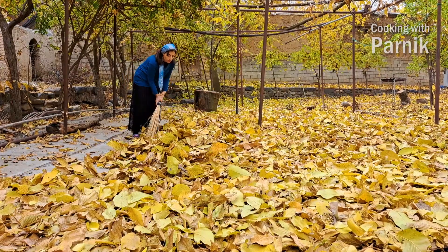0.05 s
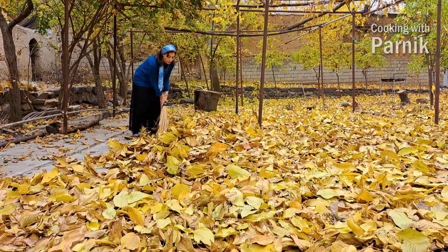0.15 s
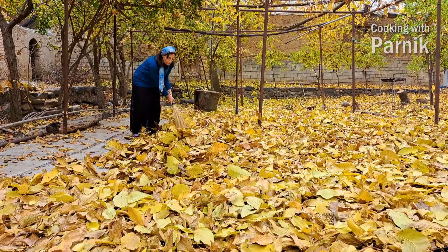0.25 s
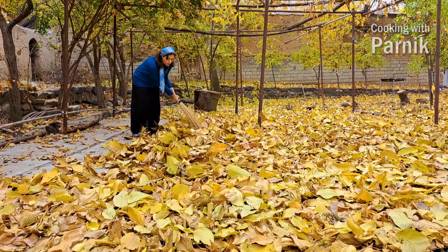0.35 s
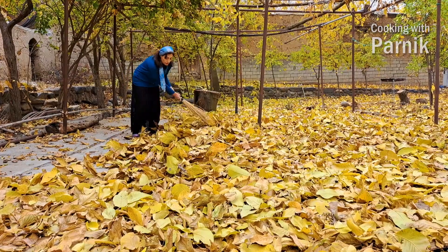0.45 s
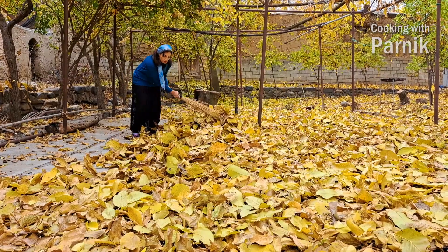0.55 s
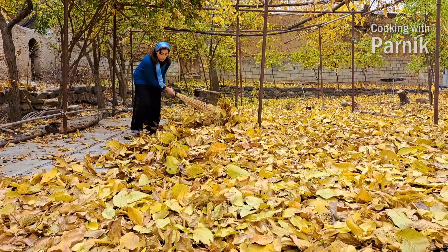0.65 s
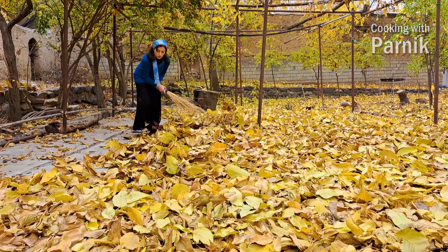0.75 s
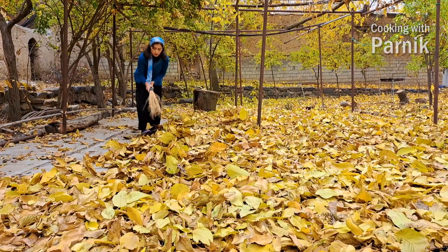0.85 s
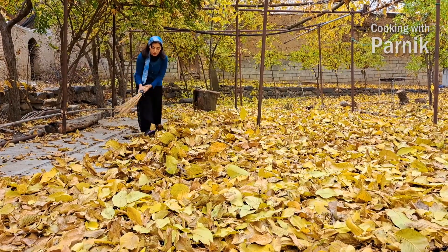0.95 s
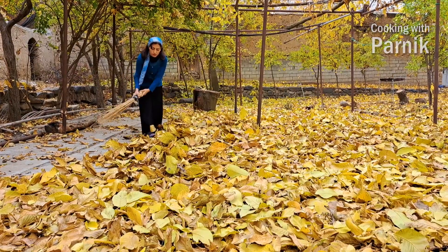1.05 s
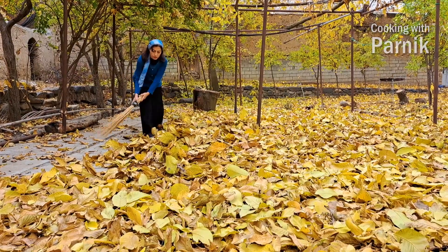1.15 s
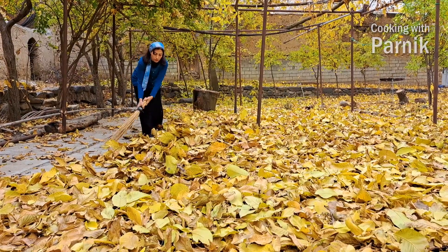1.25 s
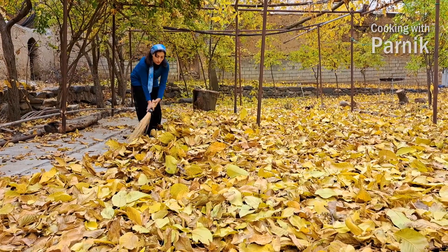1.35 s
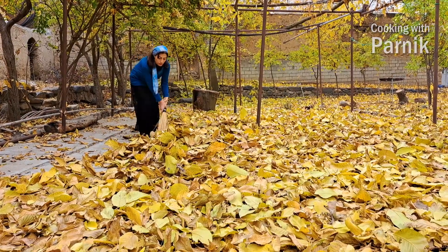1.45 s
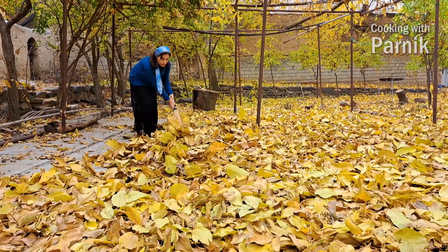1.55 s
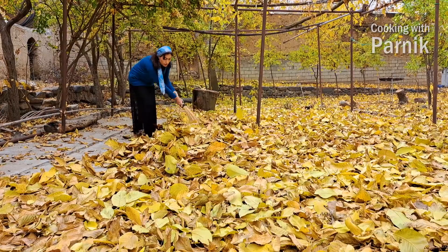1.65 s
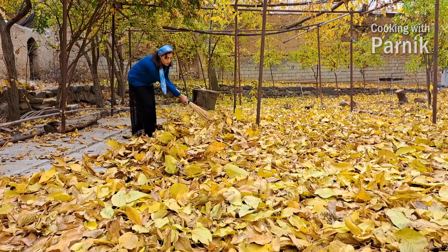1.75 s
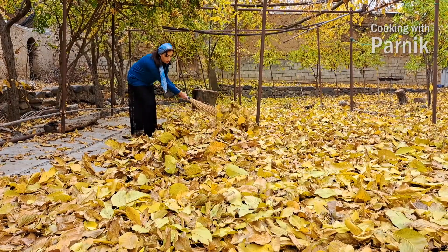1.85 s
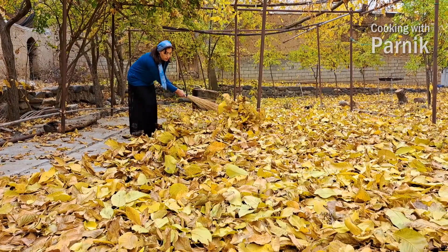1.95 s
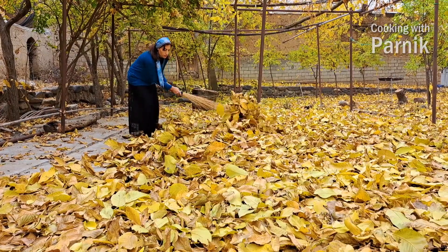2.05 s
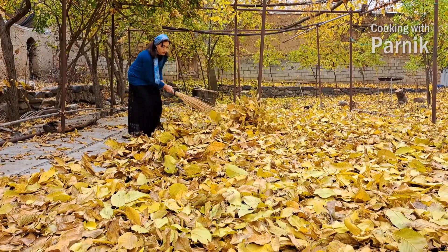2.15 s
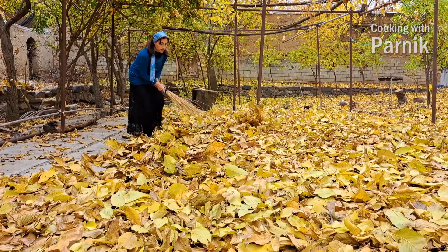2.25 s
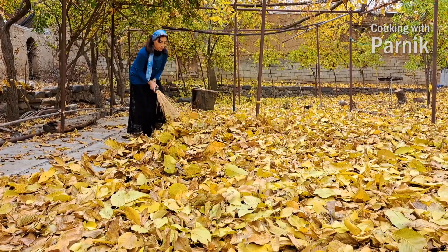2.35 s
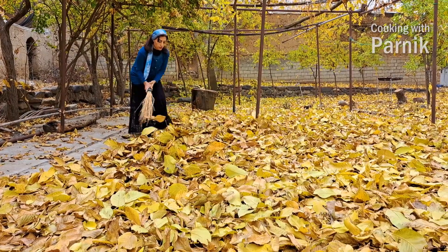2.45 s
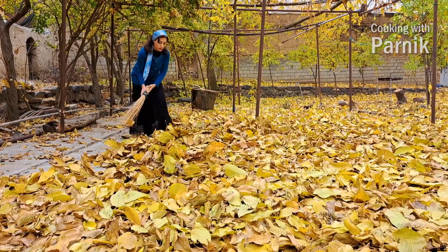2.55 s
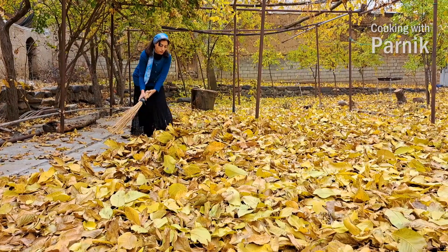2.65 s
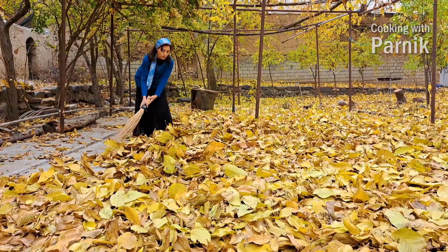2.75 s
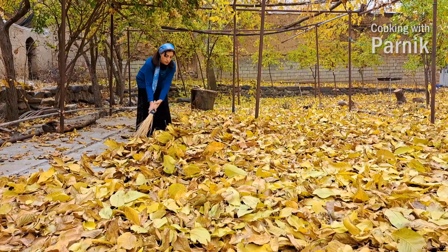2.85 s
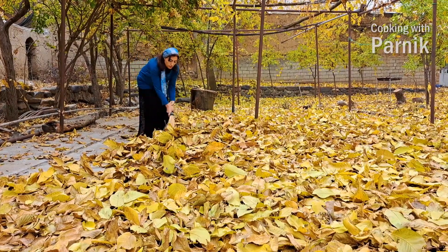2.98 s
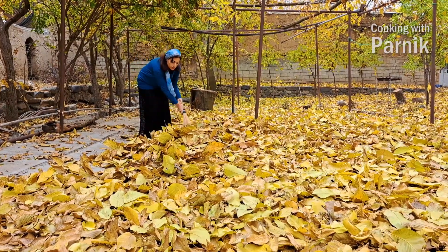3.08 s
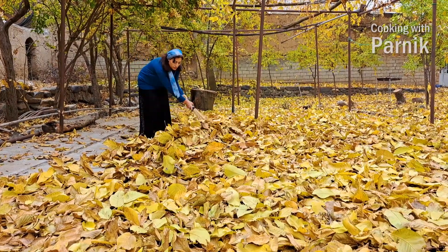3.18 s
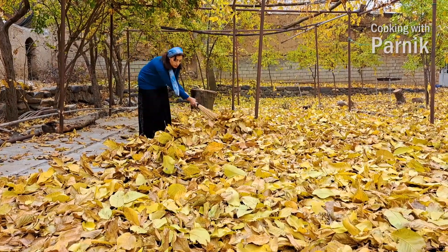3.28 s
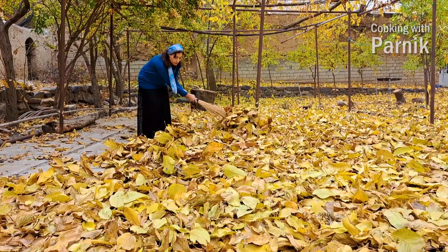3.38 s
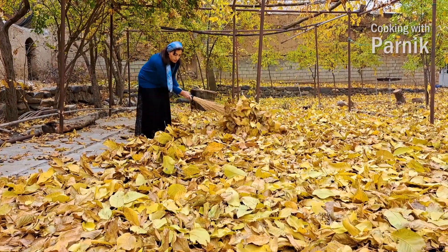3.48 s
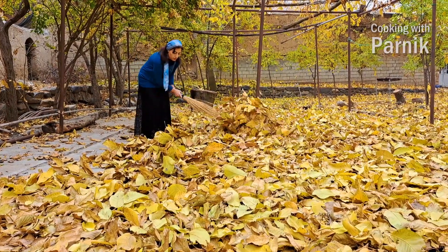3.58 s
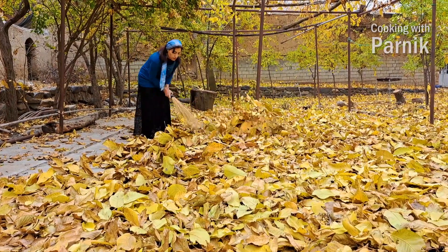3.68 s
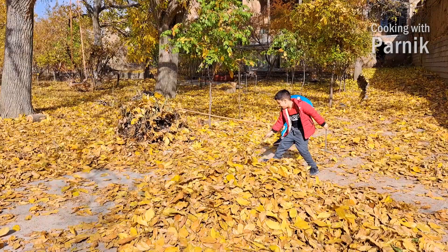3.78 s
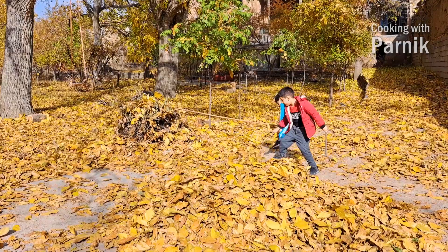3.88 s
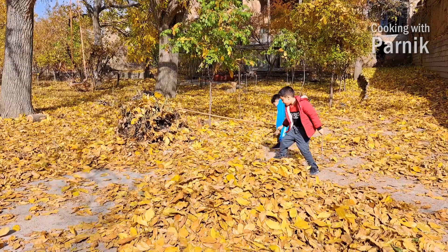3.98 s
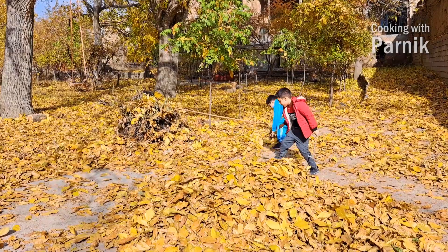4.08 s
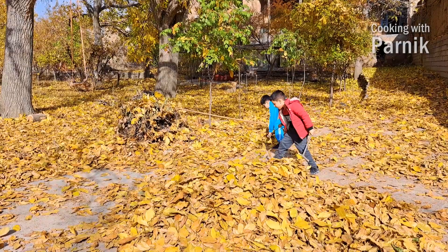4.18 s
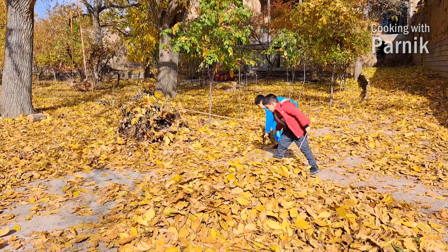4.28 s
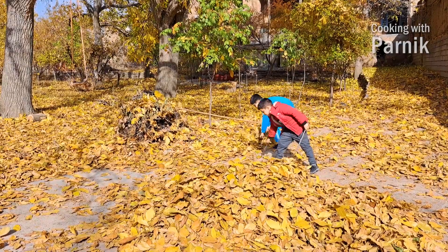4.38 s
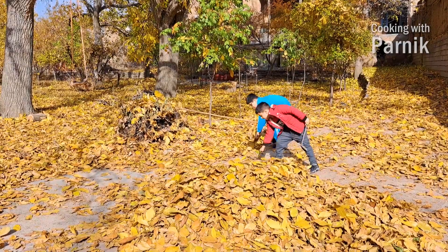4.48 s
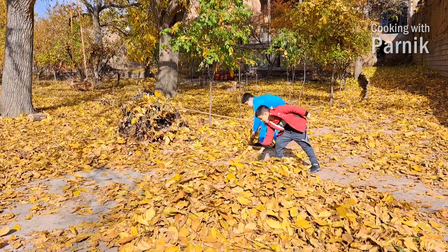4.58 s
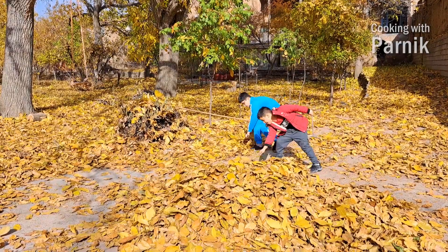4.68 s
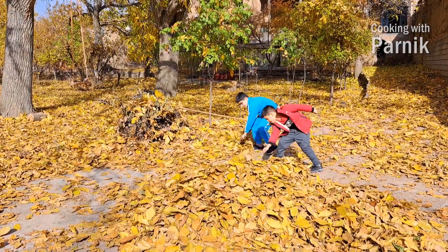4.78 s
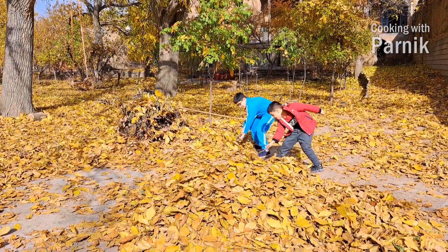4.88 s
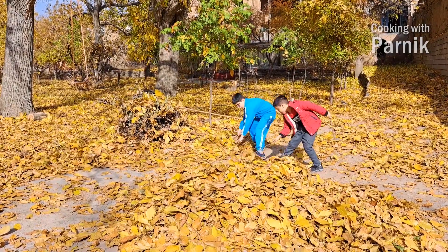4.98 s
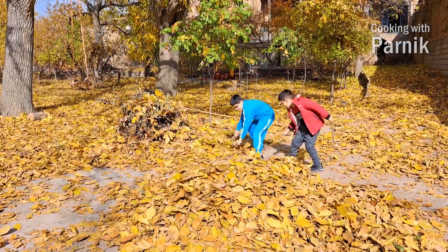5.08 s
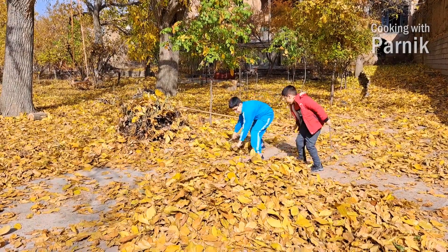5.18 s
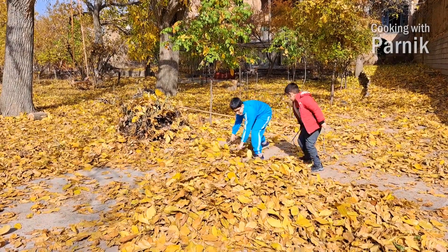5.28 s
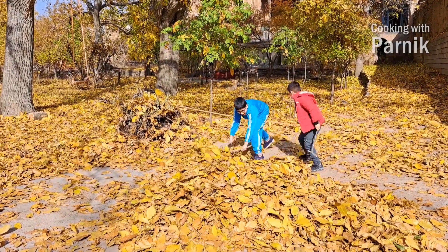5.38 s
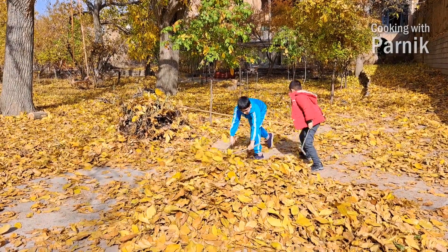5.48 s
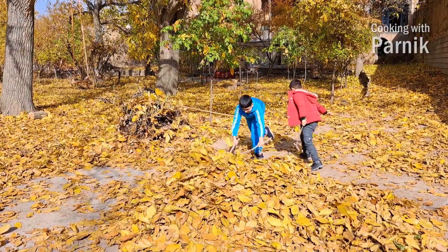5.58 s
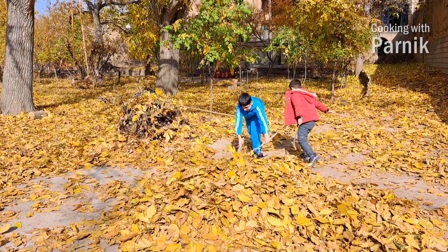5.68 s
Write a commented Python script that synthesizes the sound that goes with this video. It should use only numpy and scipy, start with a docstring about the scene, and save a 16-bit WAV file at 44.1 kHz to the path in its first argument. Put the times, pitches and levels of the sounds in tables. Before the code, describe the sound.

Outdoors in a quiet yard, a straw broom makes three strokes through deep dry leaves, each a quick bright scratch swelling into a fuller rustle, with softer returns and a few sharp snaps. Near four seconds the sound cuts to another spot, where feet and hands push a leaf heap in a longer, steadier rustle with dull knocks. Distant traffic rumbles faintly low down. Stereo microphone at moderate distance, almost no echo.

```python
"""A straw broom sweeps dry leaves over paving in three strokes; then, at another spot, feet and hands shove a heap along.
Leaves: dense random snaps over blurred noise, split into scratch, fizz, rustle and drag, driven by effort and load.
Single snaps are short noise puffs; dull knocks are pulses of a few cycles at most, with a short scatter.
Far traffic is shaped noise, with low thuds and swells in the same band, over a steady wash.
Two ports, each with its own colour, hear it all."""
import sys
import numpy as np
from scipy import signal
from scipy.fft import rfft, irfft, next_fast_len
from scipy.io import wavfile
from scipy.ndimage import uniform_filter1d

SR = 44100
rng = np.random.default_rng(int(sys.argv[2]) if len(sys.argv) > 2 else 0)


def digitize_waveform(pressure):
    """Quantize a signal to 16-bit integers and store it at the path in sys.argv[1].

    Rows of a 2-D input are taken as channels; values are limited to [-1, 1].
    """
    field = np.atleast_2d(pressure).T
    bounded = np.clip(field, -1, 1)
    quanta = np.round(bounded * 32767).astype(np.int16)
    wavfile.write(sys.argv[1], SR, quanta)


def ratio_of_db(decibels):
    """Turn decibels (scalar or array-like) into linear amplitude factors; 0 dB maps to 1."""
    return 10 ** (np.asarray(decibels, float) / 20)


N = 252693
TIME_S = np.arange(N) / SR
FREQ_HZ = np.fft.rfftfreq(next_fast_len(N + 4096, True), 1 / SR)
SPOT_CHANGE_S = 3.836  # from here the microphone is at the other spot

# Parts in order: 0 early strokes, 1 third stroke, 2 heap far, 3 heap near [t/s, part/1]
PARTS = [(2.870, 0), (2.878, 1), (3.8358, 1), (3.8362, 2), (4.5, 2), (5.1, 3)]
# Sweeping, one table a stroke with its return, the last for the heap [t/s, effort/dB, load of leaves/dB]
STROKES = [
    [(0, -41.5, -6), (.07, -44.5, -15), (.11, -38.5, -19), (.175, -37.5, -24), (.215, -32, -26),
     (.275, -24, -9), (.5, -32, -2), (.69, -34, -10.5), (.73, -42.5, -11), (.94, -42, -12),
     (1.06, -46, -12), (1.14, -50, -10.5), (1.303, -48.5, -23)],
    [(1.309, -40, -28), (1.335, -36, -26), (1.365, -35, -25), (1.45, -24.5, -22), (1.495, -22.5, -20.5),
     (1.52, -22.5, -11.5), (1.66, -28, -3.5), (1.81, -26, -5), (1.87, -30, -2), (2.01, -31, -11),
     (2.045, -35.5, -11), (2.165, -34, -12.5), (2.21, -38.5, -8), (2.37, -38, -12), (2.5, -39, -9),
     (2.68, -51.5, -11.5), (2.875, -53.5, -14.5)],
    [(2.878, -43.5, -36), (2.913, -36, -25), (2.97, -28, -18.5), (2.995, -28, -8), (3.13, -29.5, -2),
     (3.19, -26, -1), (3.67, -31, -11), (3.76, -35.5, -12.5), (3.815, -33, -8), (3.835, -33, -6)],
    [(3.837, -52.5, 0.5), (3.92, -40.5, -14), (4.04, -37, -6), (4.3, -35, -6), (4.59, -30.5, -6),
     (4.685, -25, -7), (4.725, -30, -4), (4.89, -30, -4), (5.12, -28, -4), (5.25, -27.5, -5.5),
     (5.35, -25, -5), (5.56, -26.5, -4.5), (5.72, -30.5, -2.5)],
]
# Relative spectral densities of the upper voices [f/Hz, level/dB]
SCRATCH_COLOUR = [(5000, -55), (7500, -5), (9000, -3.5), (11000, 0), (13000, 1.5), (16000, -2.5)]
FIZZ_COLOUR = [(1500, -22), (3000, -3.5), (5000, 3.5), (7500, 0), (9000, -12.5), (12000, -33)]
# Rustle: strokes 1-2, stroke 3, heap; one table each, relative density [f/Hz, level/dB]
RUSTLE_COLOURS = [
    [(600, -18.5), (1050, -9.5), (1600, 1), (2200, -1.5), (2900, -3), (4500, -13.5), (7000, -47)],
    [(600, -16.5), (1050, -5.5), (1550, 1.5), (2200, -2), (2900, -3), (4500, -10), (7000, -29)],
    [(600, -28), (1100, -9), (1450, 1), (1900, -2), (2300, -1.5), (2800, -3.5), (4500, -8.5), (7000, -20.5)],
]
# Drag: strokes, heap far, heap near; one table each, relative density [f/Hz, level/dB]
DRAG_COLOURS = [
    [(70, -13), (160, -8.5), (260, -2.5), (400, -1), (530, 0.5), (750, -5), (1050, -10), (1600, -17.5)],
    [(60, -30), (160, -1.5), (300, -2), (430, -8.5), (650, -3), (1050, -1.5), (1600, -32)],
    [(70, -20), (240, -3), (430, -9), (600, -9), (800, 0.5), (1100, -5.5), (1600, -46)],
]
# Voice level over effort, one value a part [level/dB]
SCRATCH_OVER_EFFORT_DB = [-3.5, -4.5, -7, -5.5]
RUSTLE_OVER_EFFORT_DB = [-1, 0, 0, 0]
# Loudest single snaps, peak ahead of colouring [t/s, peak/dB]
SNAPS = [(0.106, -16), (.598, -11), (0.6782, -14), (.695, -20), (.8335, -26), (1.403, -13), (1.418, -14),
         (1.446, -6), (1.4965, -12), (2.705, -32), (2.8775, -30), (3.81, -11), (3.832, -15), (4.686, -14),
         (5.3014, -12), (5.3274, -13), (5.444, -14)]
# Filter on the snaps [f/Hz, gain/dB]
SNAP_COLOUR = [(800, -25), (1600, -9), (4500, 3.5), (8000, -4), (13000, -3), (16000, -10)]
# Dull knocks of broom or foot, peak ahead of scatter and port balance [t/s, peak/dB, f/Hz, length/cycles]
KNOCKS = [(1.1035, -45, 750, 1.2), (1.1106, -41, 400, 1.2), (2.7414, -32, 1000, 0.83),
          (4.363, -21.5, 420, 2.4), (4.371, -29.5, 200, 0.76), (4.701, -33, 82, 1.5),
          (4.73, -29.5, 123, 1.3), (4.76, -31.5, 160, 2.8)]
# Low band of traffic and thuds, and steady wash of the town, relative densities [f/Hz, level/dB]
LOW_COLOUR = [(15, -35), (35, -12), (52, 3.5), (62, 7.5), (78, -11), (95, -13), (200, -32)]
WASH_COLOUR = [(60, -8), (130, -0.5), (500, -23), (1000, -14)]
# Traffic drawing away, level ahead of thuds and swells [t/s, level/dB]
TRAFFIC_LEVEL = [(0, -49.5), (1.5, -54.5), (2.0, -65), (3.4, -64.5), (4.2, -61), (5.7, -69)]
# Low thuds and swells, the one at 4.716 s a footfall [t/s, rise/dB, half-length/s]
LOW_THUDS = [(0.663, 9, 0.2), (1.56, 7, 0.074), (1.8, 6, .1), (2.55, 12, 0.094), (3.3, 5, .15),
             (3.688, 14, .12), (4.716, 17, 0.093), (5.35, 4, .1)]
# Echo off the ground, one row a spot [delay/s, level/dB]
GROUND = [(.0009, -30), (.00155, -15)]
# Port colours [f/Hz, left gain/dB, right gain/dB]
PORTS = [(40, -8, -7), (148, 0.8, 2.5), (2270, -0.5, 2), (3350, -3, 5), (4650, -8.5, 8), (5470, -8, 3),
         (6300, -8, -2), (8120, 0, 3.5), (8660, -4.5, 2), (9200, 2.5, -5), (10850, 1, 2), (12400, 3, 6.5),
         (15000, -0.5, -1), (15700, 0, -5)]
# Port match, one table a spot [f/Hz, left-right likeness/1, phase of right against left/rad]
PORT_MATCH = [
    [(60, 1, 0.5), (500, 0.96, 0), (890, 0.34, 0), (1450, 0.6, -1.85), (2000, 0.34, -1), (2840, 0.16, 1.5),
     (4360, 0.38, -1), (6100, 0, -3.5)],
    [(200, 0.98, 0), (784, 0.72, 0), (1360, 0.12, 1.8), (2000, 0.05, 0), (2540, 0.9, 2), (4500, 0.38, -1),
     (5940, 0.24, 2.5), (7700, 0.3, 1.5), (9700, 0.57, 1), (15000, 0.06, 1)],
]


def evened(x):
    """Scales to rms 1."""
    return x / np.sqrt(np.mean(x ** 2) + 1e-20)


def over_time(points):
    """Joins a two-column table over time by straight lines."""
    return np.interp(TIME_S, *np.transpose(points))


def over_freq(points, column=1):
    """Joins a table over a log frequency axis."""
    table = np.transpose(points)
    return np.interp(np.log(FREQ_HZ + 1), np.log(table[0] + 1), table[column])


def at_ports(pair, colour_db, spot=0):
    """Colours two signals, adds the ground echo and mixes them to the likeness and phase of the ports."""
    delay_s, echo_db = GROUND[spot]
    echo = 1 + ratio_of_db(echo_db) * np.exp(-2j * np.pi * FREQ_HZ * delay_s)
    a, b = rfft(pair, 2 * len(FREQ_HZ) - 2) * ratio_of_db(colour_db) * echo
    likeness = np.clip(over_freq(PORT_MATCH[spot]), 0, 1)
    turn = np.exp(1j * over_freq(PORT_MATCH[spot], column=2))
    left = a * ratio_of_db(over_freq(PORTS, column=1))
    right = likeness * turn * a + np.sqrt(1 - likeness ** 2) * b
    right = right * ratio_of_db(over_freq(PORTS, column=2))
    return irfft([left, right])[:, :N]


def burst(decay_s):
    """A noise puff for each port: instant start, exponential decay."""
    t_s = np.arange(900) / SR
    return rng.standard_normal((2, len(t_s))) * np.exp(-t_s / decay_s)


def rumble():
    """Far traffic as noise around one low hump, low thuds and swells in the same band, a steady wash."""
    wash_db = -58
    level_db = over_time(TRAFFIC_LEVEL)
    for s, rise_db, half_length_s in LOW_THUDS:
        level_db = level_db + rise_db * np.exp(-((TIME_S - s) / half_length_s) ** 2)
    low = at_ports(rng.standard_normal((2, N)), over_freq(LOW_COLOUR))
    wash = at_ports(rng.standard_normal((2, N)), over_freq(WASH_COLOUR))
    return ratio_of_db(level_db) * low / low.mean(0).std() + ratio_of_db(wash_db) * evened(wash)


def knocks():
    """Soft pushes on the ground: Gaussian-windowed cosines, then a short scatter off trees and wall."""
    pushes = np.zeros(N)
    for s, peak_db, hz, cycles in KNOCKS:
        turns = (TIME_S - s) * hz
        envelope = np.exp(-np.minimum((2 * turns / cycles) ** 2, 50))
        pushes -= ratio_of_db(peak_db) * envelope * np.cos(2 * np.pi * turns)
    t_s = np.arange(3000) / SR
    # falls 60 dB in 0.17 s, starts after 2 ms
    scatter = rng.standard_normal((2, len(t_s))) * ratio_of_db(-60 * t_s / 0.17) * (t_s > 0.002)
    scatter /= np.linalg.norm(scatter[0])
    scattered = signal.oaconvolve(pushes[None], scatter, axes=1)[:, :N]
    balance_db = [[-1.2], [1.2]]
    return (pushes + ratio_of_db(-2) * scattered) * ratio_of_db(balance_db)


def snaps():
    """A stalk or stiff leaf breaks: a noise puff with a short linear rise."""
    decay_s, rise_s = 0.0018, 0.0004
    out = np.zeros((2, N + 900))
    for s, peak_db in SNAPS:
        puff = burst(decay_s) * np.minimum(np.arange(900) / SR / rise_s, 1)
        start = round(s * SR)
        out[:, start:start + 900] += ratio_of_db(peak_db) * puff / abs(puff).max()
    return at_ports(out[:, :N], over_freq(SNAP_COLOUR))


def crackle(per_s, spread_db, decay_s, blur):
    """Random snaps of uneven size in eight shapes, over noise for those too small to tell apart."""
    size = ratio_of_db(spread_db * np.minimum(rng.exponential(1, N), 5)) * (rng.random(N) < per_s / SR)
    shape = rng.integers(0, 8, N)
    grains = np.zeros((2, N))
    for k in range(8):
        hits = size * (shape == k)
        grains += signal.oaconvolve(hits[None], burst(decay_s), axes=1)[:, :N]
    # blur: share of power in the noise
    return np.sqrt(1 - blur) * evened(grains) + np.sqrt(blur) * rng.standard_normal((2, N))


def patchy(x, patch_db, surge_db):
    """Clumps of leaves come and go: patches in time and pitch, short surges of all pitches."""
    z = signal.stft(x, nperseg=512, noverlap=384)[2]
    field = rng.standard_normal(z.shape[:0:-1]).T
    field = uniform_filter1d(field, size=8, axis=0)
    patches = evened(uniform_filter1d(field, size=16, axis=1))
    surges = evened(uniform_filter1d(rng.standard_normal(z.shape[2]), size=9))
    z = z * ratio_of_db(patch_db * patches + surge_db * surges)
    return signal.istft(z, nperseg=512, noverlap=384)[1][:, :N]


def layer(drive, colours, level_db, lo_hz, hi_hz):
    """One voice: crossfades a colour a part, each scaled by its mid-signal rms in the voice's band."""
    band = signal.butter(4, [lo_hz, hi_hz], "band", fs=SR, output="sos")
    part = over_time(PARTS)
    out = np.zeros((2, N))
    for k, colour in enumerate(colours):
        sound = at_ports(drive, over_freq(colour), spot=k // 2)
        weight = np.clip(1 - abs(part - k), 0, 1)
        out += weight * sound / signal.sosfilt(band, sound.mean(0)).std()
    return ratio_of_db(level_db) * out


def by_part(values):
    """Spreads one value a part over time."""
    return np.interp(over_time(PARTS), np.arange(len(values)), values)


def sweeping():
    """Effort, load and growth of effort (a high-pass of it), each spot on its own."""
    memory_s = 0.3
    spots = np.concatenate(STROKES[:3]).T, np.transpose(STROKES[3])
    effort_db = np.array([np.interp(TIME_S, rows[0], rows[1]) for rows in spots])
    load_db = np.array([np.interp(TIME_S, rows[0], rows[2]) for rows in spots])
    keep = np.exp(-1 / (memory_s * SR))
    growth_db = signal.lfilter([keep, -keep], [1, -keep], effort_db - effort_db[:, :1])
    return [np.where(TIME_S < SPOT_CHANGE_S, *pair) for pair in (effort_db, load_db, growth_db)]


def drag(effort_db, load_db):
    """Dull drag of the heap: sparse, slow grains that follow effort and full load."""
    grains = crackle(per_s=400, spread_db=2.5, decay_s=0.0032, blur=0.73)
    grains = patchy(grains, patch_db=1.25, surge_db=0.37)
    return layer(grains, DRAG_COLOURS[:1] + DRAG_COLOURS, effort_db + load_db, lo_hz=150, hi_hz=900)


def rustle(effort_db, load_db):
    """Leaf on leaf: grains of middling density that follow effort and part of the load."""
    grains = crackle(per_s=900, spread_db=2.5, decay_s=0.003, blur=0.72)
    grains = patchy(grains, patch_db=-0.2, surge_db=0.3)
    level_db = effort_db + by_part(RUSTLE_OVER_EFFORT_DB) + 0.59 * load_db
    return layer(grains, RUSTLE_COLOURS + RUSTLE_COLOURS[2:], level_db, lo_hz=1100, hi_hz=3200)


def fizz_and_scratch(effort_db, load_db, growth_db):
    """Dense, short grains in two bands; straw tips scratch harder while effort grows, softer as it falls."""
    grains = crackle(per_s=1500, spread_db=3.0, decay_s=0.0014, blur=0.87)
    grains = patchy(grains, patch_db=1.0, surge_db=0.49)
    bite_db = 0.25 * np.maximum(growth_db, 0) + 0.12 * np.minimum(growth_db, 0)
    scratch_db = effort_db + by_part(SCRATCH_OVER_EFFORT_DB) + bite_db - 0.05 * load_db
    return (layer(grains, 4 * [FIZZ_COLOUR], effort_db, lo_hz=3300, hi_hz=8500)
            + layer(grains, 4 * [SCRATCH_COLOUR], scratch_db, lo_hz=8500, hi_hz=15500))


def leaves():
    """Swept leaves: the lower the voice, the slower and sparser its grains."""
    effort_db, load_db, growth_db = sweeping()
    high = fizz_and_scratch(effort_db, load_db, growth_db)
    return high + rustle(effort_db, load_db) + drag(effort_db, load_db)


def scene():
    """All sources at the two ports."""
    return leaves() + snaps() + knocks() + rumble()


def top_cut(x):
    """Nothing passes above the cut-off."""
    return signal.sosfilt(signal.butter(12, 16060, fs=SR, output="sos"), x)


def record(dry):
    """Band limit: a steep linear-phase low-pass."""
    edge_hz = 15890
    edge = signal.firwin(2047, edge_hz, window=("kaiser", 9), fs=SR)
    mix = signal.oaconvolve(dry, edge[None], "same", axes=1)
    return top_cut(mix)


dry = scene()
out = record(dry)
digitize_waveform(out)
```